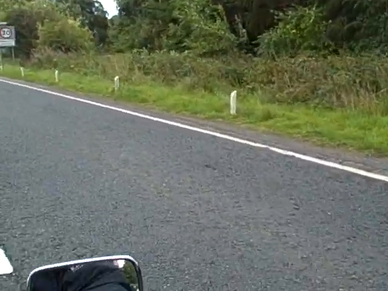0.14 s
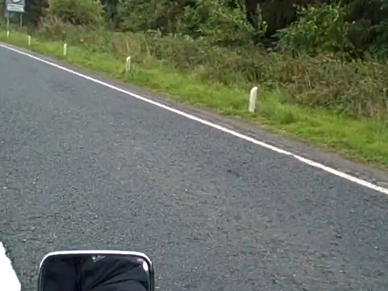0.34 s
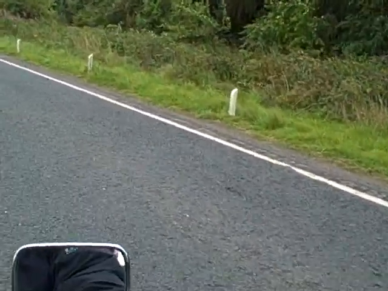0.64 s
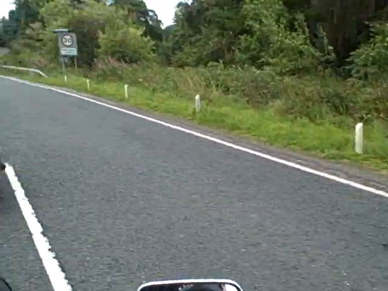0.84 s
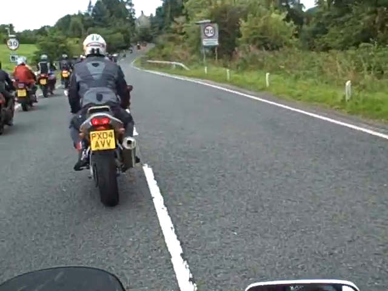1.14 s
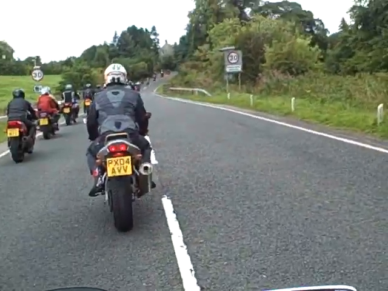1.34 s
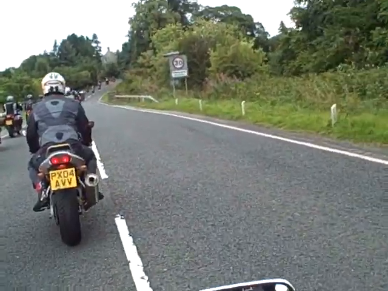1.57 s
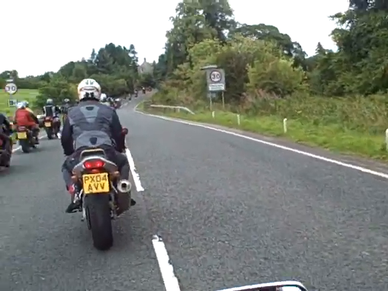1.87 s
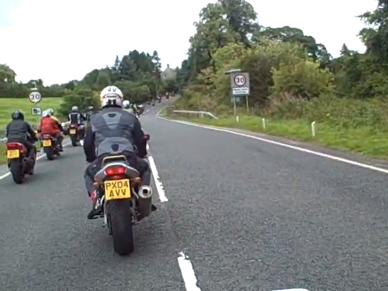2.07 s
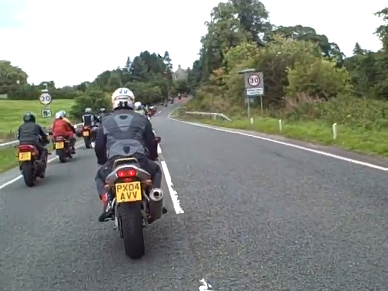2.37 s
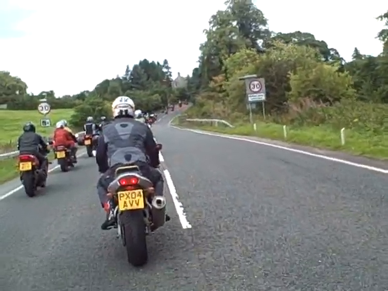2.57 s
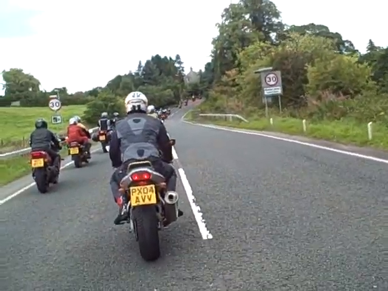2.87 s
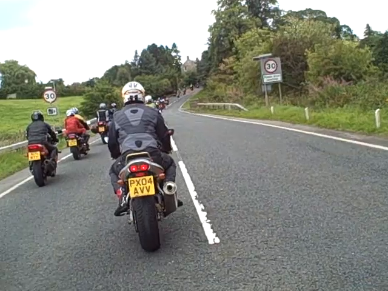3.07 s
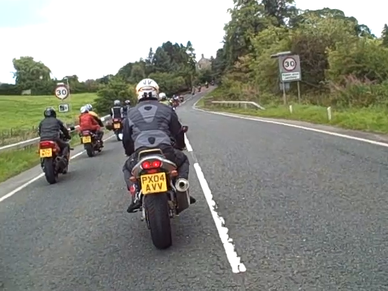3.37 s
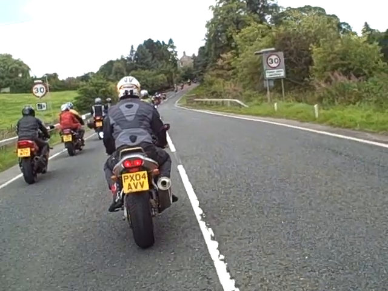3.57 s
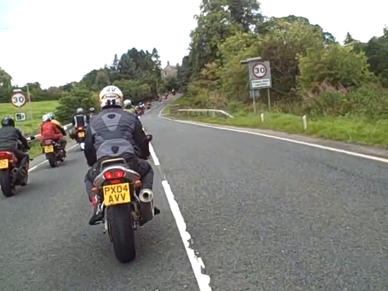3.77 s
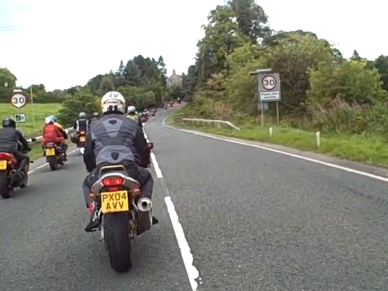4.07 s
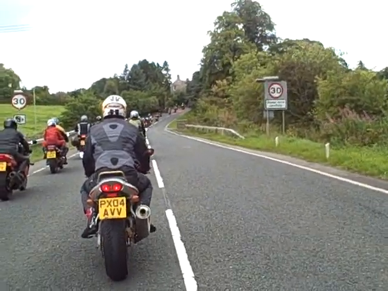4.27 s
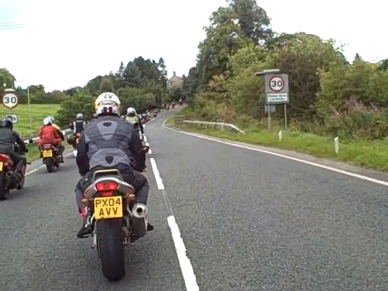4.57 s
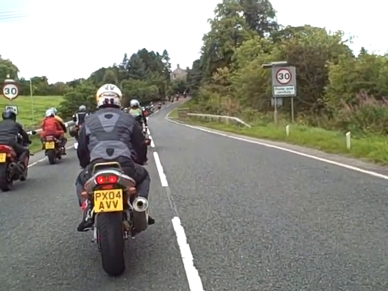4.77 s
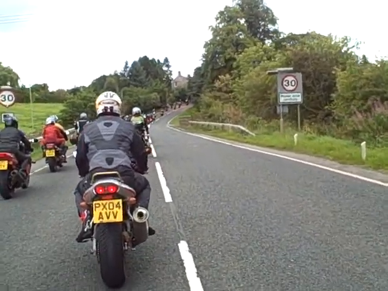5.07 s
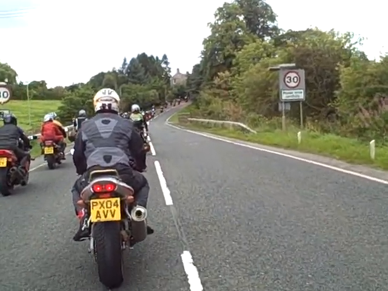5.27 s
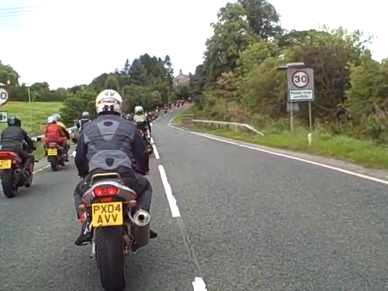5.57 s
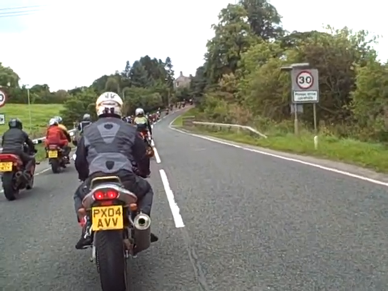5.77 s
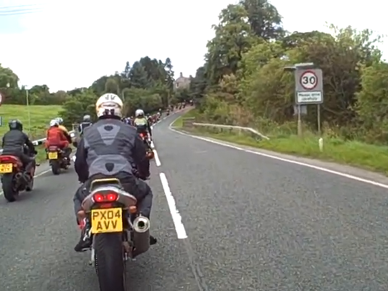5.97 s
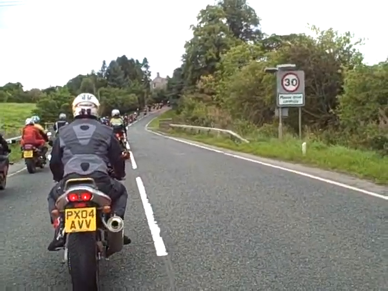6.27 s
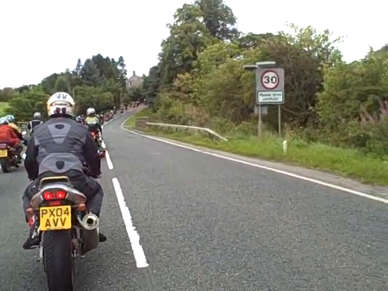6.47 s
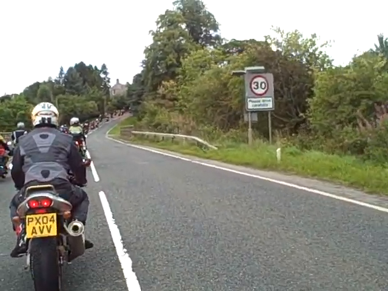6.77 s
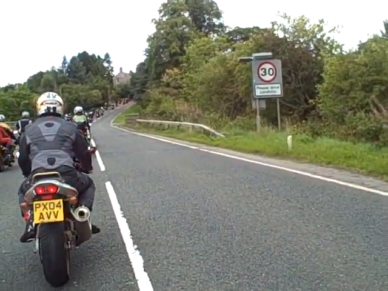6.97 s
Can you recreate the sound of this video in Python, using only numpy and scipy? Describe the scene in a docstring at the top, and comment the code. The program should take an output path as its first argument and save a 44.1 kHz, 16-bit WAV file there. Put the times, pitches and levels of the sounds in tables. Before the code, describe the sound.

A big twin-cylinder motorcycle lopes near idle in a slow column of bikes, pulls harder for two seconds, then is blipped twice.

```python
"""A big twin-cylinder motorcycle lopes near idle under the microphone, in a slow column of motorcycles.
Its exhaust pulses ring silencer resonances; it pulls for two seconds, then is blipped twice.
A sum of sine orders hums as a four-cylinder ahead, and smeared pulse trains rumble as the pack.
Filtered noise makes the hiss of tyres and air, the gusts, the valve clatter and a few close ticks and scuffs.
A neighbouring engine briefly drones as it speeds up."""
import sys
import numpy as np
from scipy import signal
from scipy.fft import rfft, irfft, next_fast_len
from scipy.io import wavfile
from scipy.ndimage import minimum_filter1d

SR = 44100
rng = np.random.default_rng(int(sys.argv[2]) if len(sys.argv) > 2 else 0)


def store_wav(level_fs):
    """Save 16-bit WAV to argv[1]."""
    pcm = np.round(np.clip(np.atleast_2d(level_fs), -1, 1) * 32767)
    wavfile.write(sys.argv[1], SR, pcm.T.astype(np.int16))


N = 314433
TIME = np.arange(N) / SR
SECOND_FIRING = 0.237  # delay of the second cylinder, in engine cycles

# Airflow past the bike. Each row: time in seconds, change of level in dB.
AIRFLOW = [(0, -0.4), (1.3, -1.0), (1.8, 0.3), (3.5, 1.2), (4.4, -1.0), (5.3, -0.7), (6.1, 1.0), (7.13, -1)]


def from_db(db):
    """Level is logarithmic: 20 dB is a factor of ten in amplitude."""
    return 10 ** (np.asarray(db) / 20)


def rms_one(x):
    """Dividing by the root mean square gives a signal unit effective amplitude."""
    return x / np.sqrt(np.mean(x ** 2) + 1e-20)


def in_time(rows):
    """Linear interpolation: each column of a curve, at every sample."""
    times, *columns = np.transpose(rows)
    return [np.interp(TIME, times, column) for column in columns]


def swell(s, half_s):
    """Gaussian envelope: a smooth rise and fall of height 1, with standard deviation half_s."""
    return np.exp(-0.5 * ((TIME - s) / half_s) ** 2)


def drift(rate_hz):
    """Low-passed noise: a random wander of rms 1, slower for a lower corner rate."""
    step = 40  # samples between computed points
    r = np.exp(-2 * np.pi * rate_hz * step / SR)
    white = rng.standard_normal(N // step + 2002)
    slow = signal.lfilter([1], [1, -2 * r, r * r], white)[2000:]  # drop the filter's start-up
    return np.interp(np.arange(N) / step, np.arange(len(slow)), rms_one(slow))


def colour(x, spectrum):
    """Spectral shaping: weight each frequency, falling 24 dB per octave beyond the ends; rms 1."""
    hz, db = np.transpose(spectrum)
    octave = np.log2(np.arange(N + 1) * SR / (2 * N) + 1)
    points = np.log2(hz)
    beyond = np.abs(octave - np.clip(octave, points[0], points[-1]))
    gain_db = np.interp(octave, points, db) - 24 * beyond
    size = next_fast_len(N)
    gain = np.interp(np.linspace(0, N, size // 2 + 1), np.arange(N + 1), from_db(gain_db))
    return rms_one(irfft(rfft(x, size) * gain, size)[:N])


def noise(spectrum):
    """Turbulence and friction are broadband: coloured random noise of rms 1."""
    return colour(rng.standard_normal(N), spectrum)


def ring(clicks, hz, t60):
    """Damped free vibration: a unit click starts a sine of height 1 that falls 60 dB in t60 seconds."""
    r = from_db(-60 / (t60 * SR))
    w = 2 * np.pi * hz / SR
    return signal.lfilter([0, np.sin(w)], [1, -2 * r * np.cos(w), r * r], clicks + 1e-18)


def pipe(clicks, modes):
    """Modal superposition: the resonances of a pipe add, neighbours in opposite sign."""
    out = 0
    for k, (hz, db, t60) in enumerate(modes):
        out = out + (-1) ** k * from_db(db) * ring(clicks, hz, t60)
    return out


def band(x, hz, width_hz):
    """Resonant selection: one band-pass resonance with gain 1 at its top."""
    r = np.exp(-np.pi * width_hz / SR)
    top = np.array([1, 0, -1]) * (1 - r * r) / 2
    bottom = [1, -2 * r * np.cos(2 * np.pi * hz / SR), r * r]
    return signal.lfilter(top, bottom, x + 1e-18)


def fade(clicks, decay_s):
    """Exponential relaxation: each click starts a decay with time constant decay_s."""
    return signal.lfilter([1], [1, -np.exp(-1 / (decay_s * SR))], clicks + 1e-18)


def firings(cycles, uneven_db):
    """Impulsive excitation: one click per completed cycle; burns vary randomly in strength."""
    at = np.flatnonzero(np.diff(np.floor(cycles)) > 0)
    clicks = np.zeros(N)
    clicks[at] = from_db(uneven_db * rng.standard_normal(len(at)))
    return clicks


def crank():
    """Four-stroke timing: integrated speed gives engine cycles of two turns each."""
    # The twin's crank. Each row: time in seconds, speed in rpm.
    speed = [(0.0, 1260), (0.93, 1187), (1.0, 1315), (1.77, 1233), (2.1, 1782), (2.42, 1474), (3.47, 1800),
             (3.83, 1874), (4.06, 1470), (4.73, 1234), (4.98, 2751), (5.27, 2492), (5.41, 1967),
             (5.96, 1291), (6.31, 1209), (6.66, 1286), (6.82, 2431), (7.13, 1604)]
    rpm, = in_time(speed)
    start_cycle = 0.8549
    return start_cycle + np.cumsum(rpm) / (120 * SR), rpm


def throttle():
    """Piecewise-linear control: each twist of the grip opens, holds and shuts; the widest counts."""
    # Each row: start in seconds, time to open in seconds, moment it starts to shut in seconds,
    # opening from 0 to 1.
    twists = [(1.83, .2, 2.3, 0.76), (2.22, .42, 3.1, 0.69), (2.5, 0.75, 3.78, .78), (4.72, .1, 4.94, 0.99),
              (6.59, .13, 6.8, 0.97)]
    shut_s = 0.2
    openings = []
    for starts, open_s, shuts, opening in twists:
        opens = (TIME - starts) / open_s
        closes = 1 - (TIME - shuts) / shut_s
        openings.append(opening * np.minimum(np.minimum(opens, closes), 1))
    return np.maximum(np.max(openings, axis=0), 0)


def twin(cycles, rpm, opening):
    """Pulse-excited resonance: two close firings, then a rest; speed and throttle strengthen each pulse."""
    # Silencer resonances. Each row: frequency in Hz, level in dB relative to the pulse, t60 in seconds.
    boom_modes = [(65.6, 4, 0.14), (111, 7.5, 0.125)]
    bark_modes = [(245, 14.87, 0.038), (300, 18.8, 0.019), (387, 10.74, 0.026)]
    crack_modes = [(493, 0.5, 0.03), (692, -2.5, 0.024), (940, -23, 0.022)]
    # Heavy thumps at idle. Each row: time in seconds, extra level in dB.
    thumps = [(.21, 6.5), (.61, 4.5), (.82, 7), (6.38, 4)]
    octaves = np.log2(rpm / 1250)  # above idle speed in rpm
    # burns scatter more with the throttle shut
    lope_db = 1.5 * (1 - opening) * drift(9.6)
    thump_db = sum(db * swell(s, 0.035) for s, db in thumps)
    # level at idle, rise at full throttle, rise per doubling of the crank speed
    boom_db = -20.5 + 4.5 * opening + 3.5 * octaves + lope_db + thump_db
    bark_db = -33.5 + 13.0 * opening + 6.5 * octaves + lope_db
    first = firings(cycles, uneven_db=1.0)
    second = firings(cycles - SECOND_FIRING, uneven_db=0.1)
    pulses = first + from_db(-1.0) * second
    boom = pulses * from_db(boom_db)
    bark = pulses * from_db(bark_db)
    # an open throttle sharpens the pulse
    crack = bark * from_db(1.1 * opening - 22 * (1 - opening))
    # a puff of turbulent gas follows each hard pulse
    gas_noise = noise([(400, 3), (900, -3), (1500, -14), (2300, -12), (3200, -12), (9000, -28)])
    gas = from_db(-18) * fade(crack, decay_s=0.0054) * gas_noise
    exhaust = pipe(boom, boom_modes) - pipe(bark, bark_modes) + pipe(crack, crack_modes) + gas
    # the small pipe mouth radiates no deep bass
    mouth = signal.butter(2, 24, "high", fs=SR, output="sos")
    return signal.sosfilt(mouth, exhaust)


def clatter(cycles):
    """Impact noise: valve gear taps the engine casing four times a cycle."""
    # Valves shutting. Each row: place in the engine cycle from 0 to 1, relative level in dB.
    valves = [(.04, -2), (.27, -5.5), (0.538, -2), (.8, -5)]
    # Loudness of the valve gear. Each row: time in seconds, level in dB.
    loudness = [(0, -42.8), (1.9, -45.7), (7.13, -47.5)]
    level_db, = in_time(loudness)
    taps = sum(from_db(db) * firings(cycles - place, uneven_db=2.0) for place, db in valves)
    casing = noise([(1100, -1.0), (1350, -3), (1650, 2), (2000, -5.5), (2320, 4), (2600, -14),
                    (3300, -4.5), (4200, -11.5), (8000, -17.0)])
    return from_db(level_db) * rms_one(fade(taps, decay_s=0.0057) * casing)


def four_cylinder():
    """Harmonic synthesis: engine orders form a hum and waver as the gap between the bikes changes."""
    # The engine ahead. Each row: time in seconds, firings per second, level in dB.
    running = [(0, 120, -29), (1.4, 106.5, -25.5), (2.15, 111, -29), (2.5, 96, -22), (3.1, 94, -35),
               (3.8, 101, -23.5), (4.3, 107.5, -26.5), (4.9, 103, -19.5), (5.2, 102, -33),
               (5.9, 102, -28.5), (6.2, 112, -32), (7.13, 127, -28.5)]
    # Its exhaust. Each row: multiple of the firing rate, relative level in dB.
    orders = [(.5, -6), (1, 2.5), (1.5, -3.5), (2, -0.5), (2.5, -12), (3, -21), (4, -21.5)]
    hz, level_db = in_time(running)
    turns = np.cumsum(hz * (1 + 0.008 * drift(5.66))) / SR
    hum = np.zeros(N)
    for k, db in orders:
        waver_db = 1.5 * drift(14.5)
        hum += from_db(db + waver_db) * np.sin(2 * np.pi * (k * turns + rng.random()))
    return from_db(level_db) * rms_one(hum)


def pack():
    """Incoherent superposition: engines at separately wandering speeds merge into a rumble."""
    # The other bikes together. Each row: time in seconds, level in dB.
    loudness = [(0, -18.4), (2.4, -17.5), (5.6, -18), (6.1, -20), (7.13, -18)]
    # Spectrum of the rumble. Each row: frequency in Hz, relative level in dB.
    spectrum = [(36, -12.5), (47, 4.5), (64, 2), (95, 2.5), (130, 1), (180, -3), (250, -7), (350, -17),
                (500, -26), (800, -37.5), (1300, -41)]
    level_db, = in_time(loudness)
    pulses = np.zeros(N)
    for hz in np.geomspace(29, 47, 4):  # firings per second of four engines
        cycles = rng.random() + np.cumsum(hz * (1 + 0.04 * drift(0.9))) / SR
        pulses += firings(cycles, uneven_db=1.6)
    # silencer chambers smear each pulse in time (allpasses)
    for hz, width_hz in [(60, 31), (105, 35), (210, 41)]:
        pulses = pulses - 2 * band(pulses, hz, width_hz)
    turbulence = 0.5 * rng.standard_normal(N)
    return from_db(level_db) * colour(rms_one(pulses) + turbulence, spectrum)


def road(opening):
    """Broadband rolling noise: tyres and running gear roar, slightly more with the throttle open."""
    # Each row: frequency in Hz, relative level in dB.
    spectrum = [(290, -61), (500, 0.5), (571, 1.5), (630, -1.5), (674, 1), (1010, -4), (1140, -5),
                (1400, -12.5), (1580, -8), (1940, -7.5), (2320, -9.5), (2530, -8.5), (2710, -8.5),
                (4860, -16), (7000, -22), (9100, -49), (15400, -120)]
    flow_db, = in_time(AIRFLOW)
    return from_db(-38 + flow_db + 0.9 * opening + 0.82 * drift(22)) * noise(spectrum)


def air(opening):
    """Flow noise: air hisses past and into the intake; the two add in power."""
    # Each row: frequency in Hz, relative level in dB.
    spectrum = [(3500, -16), (5500, -11.5), (7000, -2), (9000, -1), (12000, -1.5), (16000, -2)]
    flow_db, = in_time(AIRFLOW)
    passing = from_db(-50 + flow_db)
    intake = from_db(-47) * opening ** 2.7
    return np.hypot(passing, intake) * from_db(1.1 * drift(40)) * noise(spectrum)


def wind():
    """Turbulent pressure: a breeze and gusts buffet the microphone with very low noise."""
    # Each row: time of the peak in seconds, level in dB added to the breeze as amplitude.
    gusts = [(.1, -28), (.35, -29), (1.57, -27), (3.15, -36), (5.3, -23), (5.58, -27)]
    # Each row: frequency in Hz, relative level in dB.
    spectrum = [(14, -20), (25, 13), (35, 11), (70, -40)]
    buffet = from_db(-46) + sum(from_db(db) * swell(s, 0.079) for s, db in gusts)
    return buffet * noise(spectrum)


def ticks():
    """Impulse response: each small hard tick is a bright crack about a millisecond long."""
    # Each row: start in seconds, peak level in dB, centre frequency in Hz.
    cracks = [(0.106, -32, 6500), (.195, -23, 6970), (.358, -28, 6000), (0.48, -22, 9000),
              (.519, -28, 4000), (.787, -34, 6500), (.801, -33, 6500), (.829, -26, 8000), (.839, -31, 8000),
              (.873, -28, 6500), (0.892, -12, 3830)]
    out = np.zeros(N)
    age = TIME[:SR // 40]
    for s, db, hz in cracks:
        burst = rng.standard_normal(len(age)) * np.exp(-age / 0.00046)
        crack = band(burst, hz, width_hz=7000)
        at = round(s * SR)
        out[at:at + len(age)] += from_db(db) * crack / np.abs(crack).max()
    return out


def scuffs():
    """Friction excitation: brief rubbing drives a narrow high resonance in faint squeaks."""
    # Each row: time of the peak in seconds, level in dB, frequency in Hz,
    # width of each of two resonances in Hz, standard deviation of the envelope in seconds.
    rubs = [(.805, -45, 6400, 1500, 0.014), (0.877, -53, 6740, 2000, .012), (4.935, -51, 7960, 392, .005),
            (4.95, -57, 8300, 400.6, 0.0034), (4.987, -56, 7900, 400, .004),
            (6.818, -42, 7800, 499, 0.0027), (6.826, -42, 8060, 400, .003)]
    rub = rng.standard_normal(N)
    out = np.zeros(N)
    for s, db, hz, width_hz, half_s in rubs:
        squeak = rms_one(band(band(rub, hz, width_hz), hz, width_hz))
        out += from_db(db) * swell(s, half_s) * squeak
    return out


def neighbour():
    """Source and filter: quickening pulses ring a nearby pipe, a drone below and a rasp above."""
    # Each row: time of the peak in seconds, half length in seconds, firings per second at the peak,
    # rise in octaves per second, drone level in dB, rasp level in dB.
    surges = [(1.435, .043, 47, 1.2, -13.5, -29.5), (5.738, .1, 72.5, 1.1, -20.5, -55)]
    # Its pipe. Each row: frequency in Hz, relative level in dB, t60 in seconds.
    drone_modes = [(112, 8.5, 0.057), (180, 3.5, 0.078), (223.4, -1, 0.1)]
    rasp_modes = [(389, 0, 0.059), (497, -4.5, 0.02)]
    out = np.zeros(N)
    for s, half_s, rate, rise, drone_db, rasp_db in surges:
        hz = rate * 2 ** (rise * np.clip(TIME - s, -2 * half_s, 2 * half_s))
        pulses = firings(np.cumsum(hz * (1 + 0.0159 * drift(23))) / SR, uneven_db=2.5)
        near = swell(s, half_s)
        for db, modes in [(drone_db, drone_modes), (rasp_db, rasp_modes)]:
            tone = pipe(pulses, modes)
            # scaled by its rms within the swell
            out += from_db(db) * near * tone / np.sqrt(np.average(tone ** 2, weights=near ** 2))
    return out


def gain_control(x):
    """Dynamic compression: a loud passage turns the gain down; it is held a moment, then recovers."""
    sense_s, attack_s, hold_s = 0.055, 0.029, 0.4
    loud_db, slope, max_cut_db = -10, 4.0, 3  # slope: dB of cut per dB above loud_db
    recover_db_per_s = 18
    level_db = 10 * np.log10(fade(x ** 2, sense_s) / (sense_s * SR))
    cut_db = np.clip(slope * (level_db - loud_db), 0, max_cut_db)
    # the deepest cut of the recent past
    hold = int(hold_s * SR)
    held_db = -minimum_filter1d(-cut_db, hold, origin=(hold - 1) // 2, mode="nearest")
    # the cut may shrink only at the recovery rate
    ramp_db = recover_db_per_s * TIME
    released_db = np.maximum.accumulate(held_db + ramp_db) - ramp_db
    smooth_cut_db = fade(released_db, attack_s) / (attack_s * SR)
    return x * from_db(-smooth_cut_db)


def scene():
    """Linear superposition: everything as heard from the saddle."""
    cycles, rpm = crank()
    opening = throttle()
    own_bike = twin(cycles, rpm, opening) + clatter(cycles) + ticks() + scuffs()
    other_bikes = four_cylinder() + pack() + neighbour()
    surroundings = road(opening) + air(opening) + wind()
    return (own_bike + other_bikes + surroundings)[None]


def record(dry):
    """Limited range: gain ducks after loud passages, strong pulses overload the input, the top is cut."""
    clipped = np.clip(gain_control(dry), -0.705, 0.705)
    low_pass = signal.ellip(12, 0.1, 90, 15750, fs=SR, output="sos")  # cutoff in Hz
    return signal.sosfilt(low_pass, clipped)


dry = scene()
out = record(dry)
store_wav(out)
```